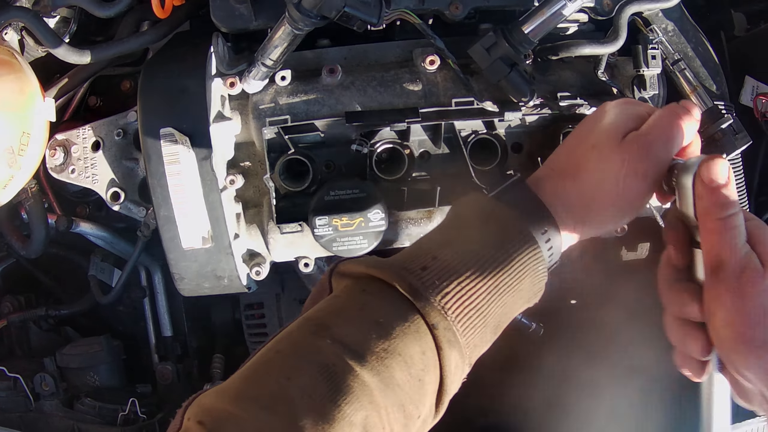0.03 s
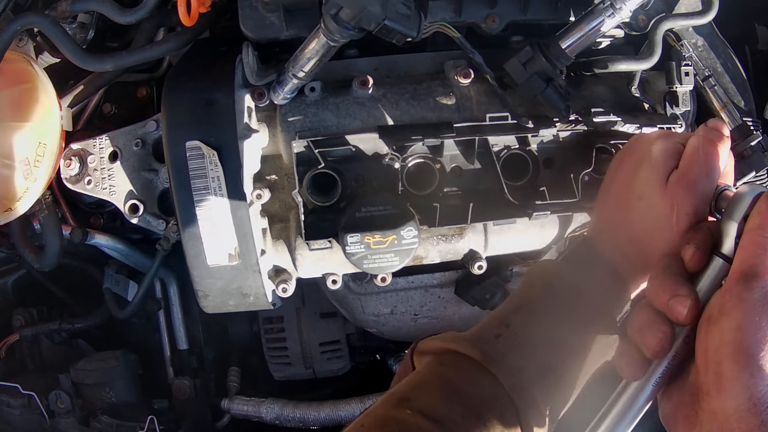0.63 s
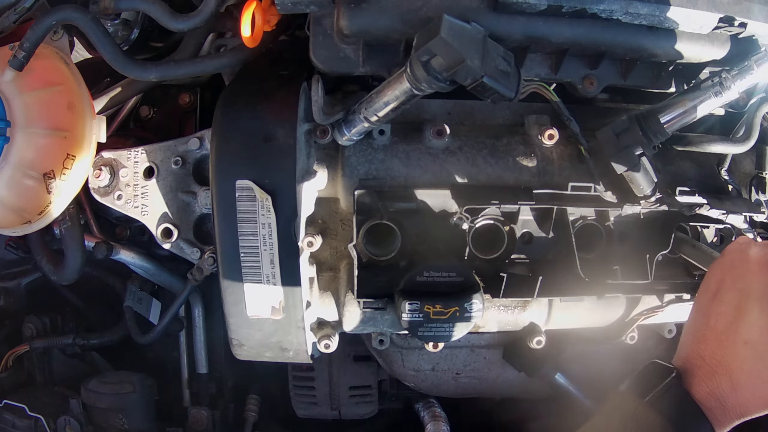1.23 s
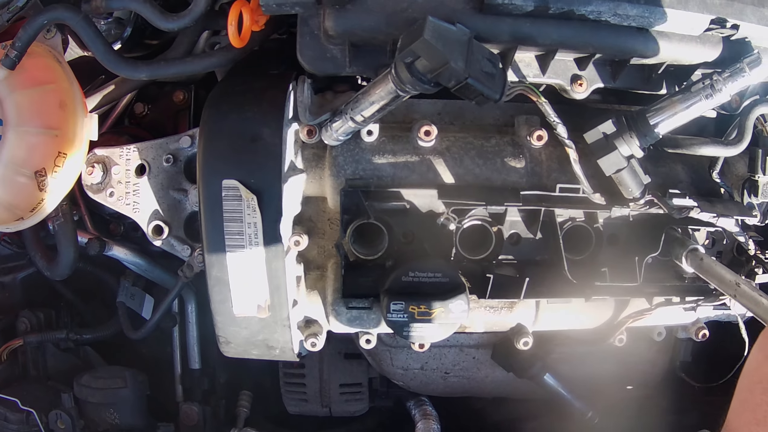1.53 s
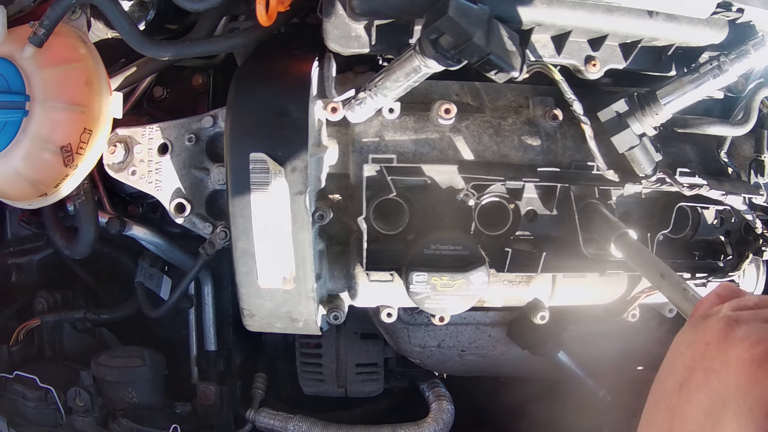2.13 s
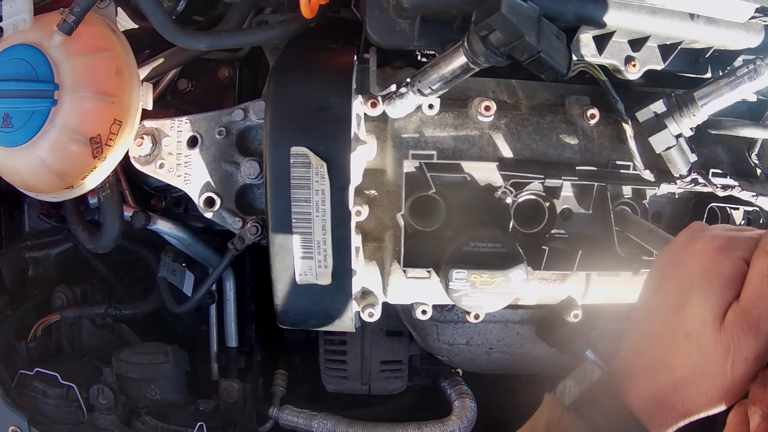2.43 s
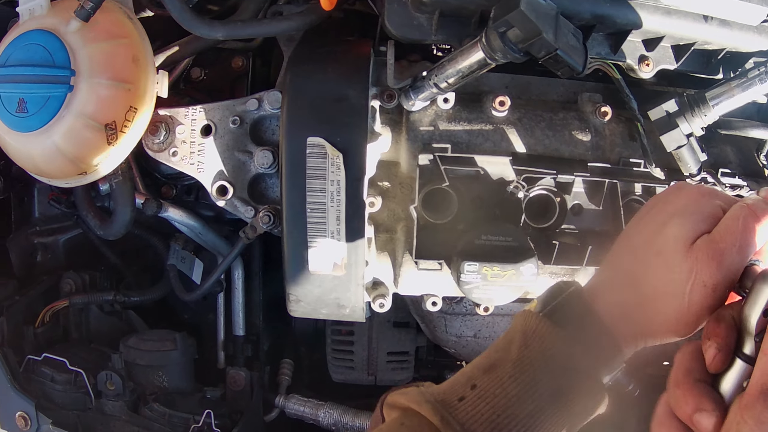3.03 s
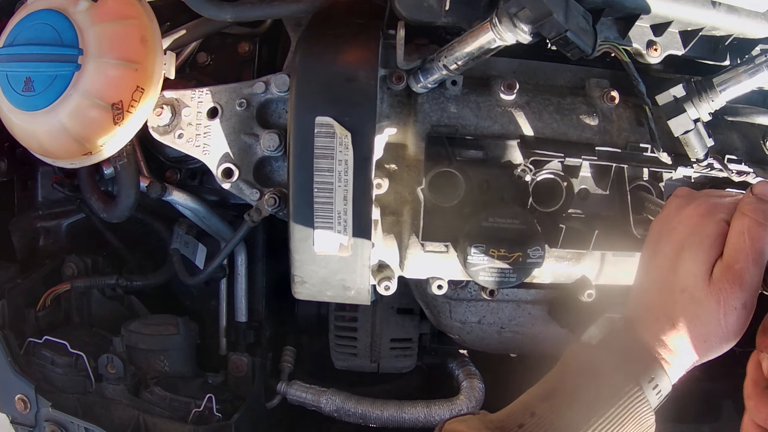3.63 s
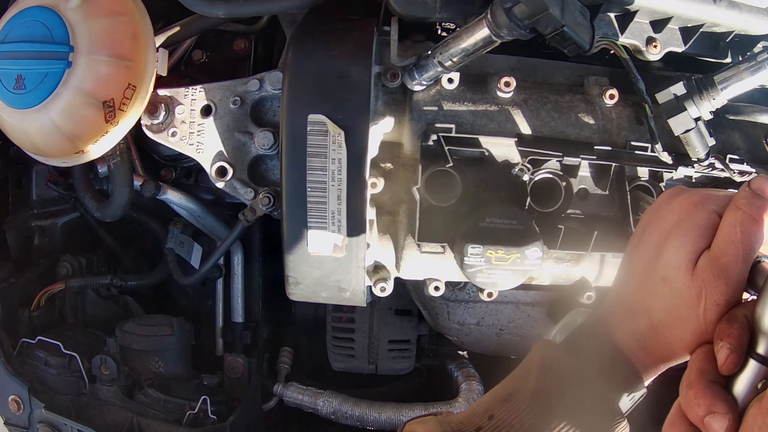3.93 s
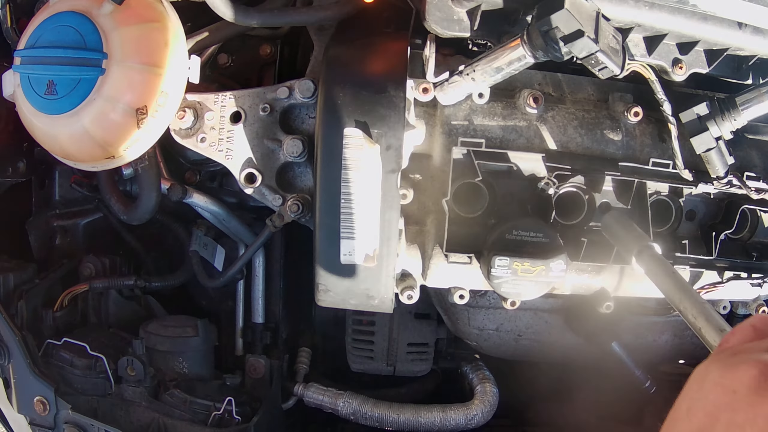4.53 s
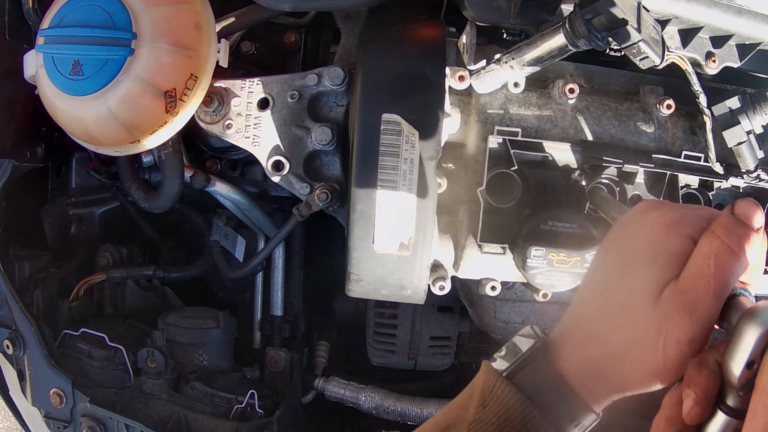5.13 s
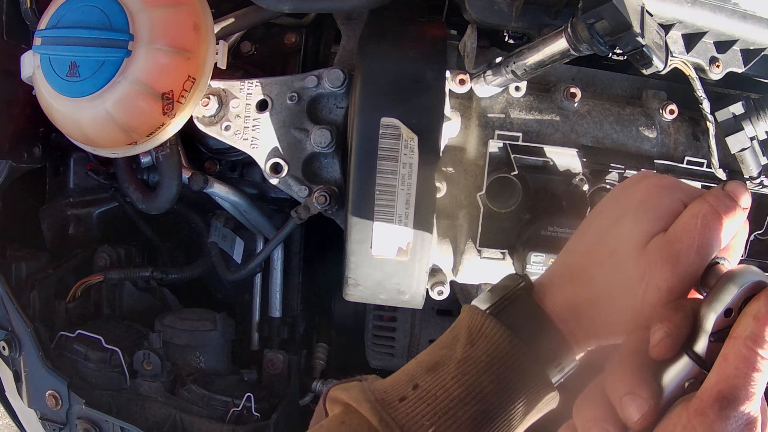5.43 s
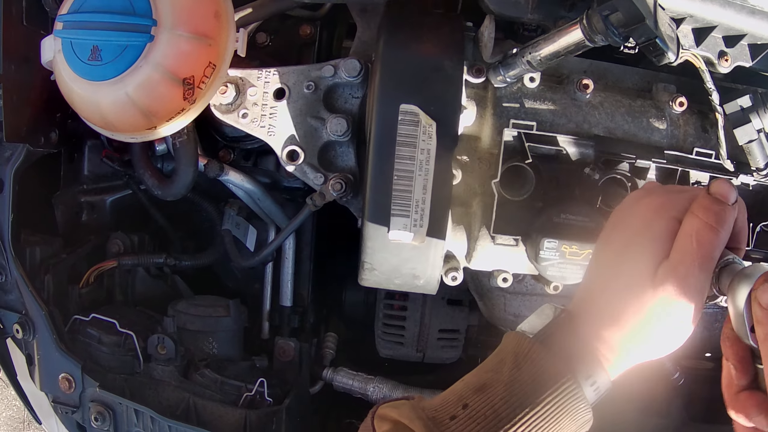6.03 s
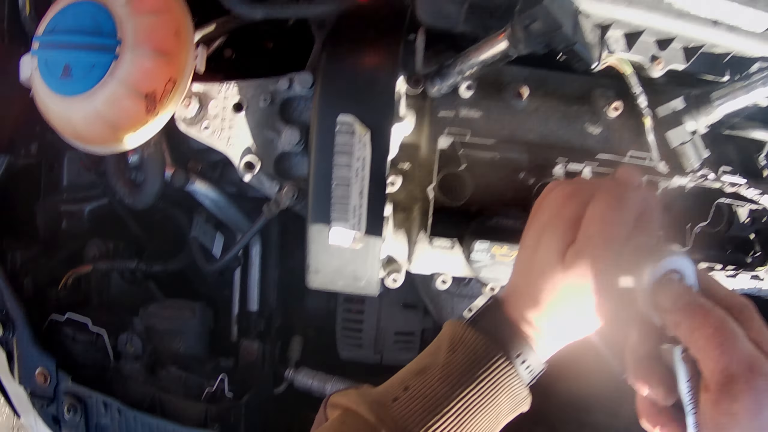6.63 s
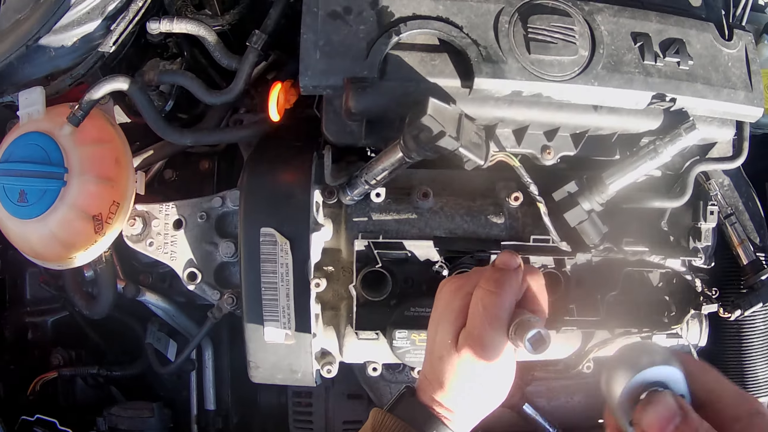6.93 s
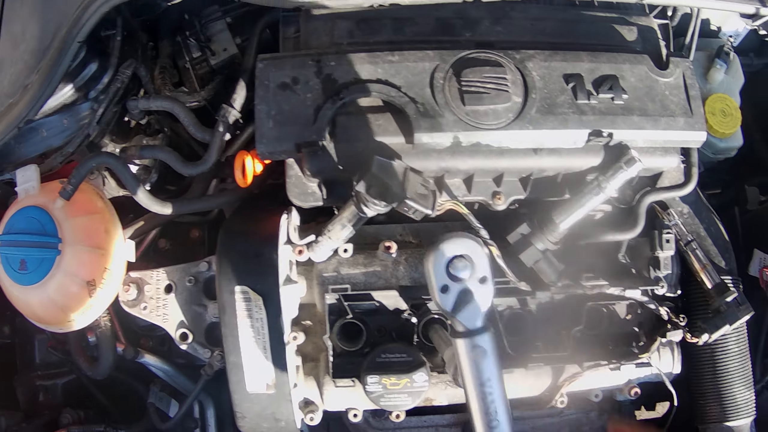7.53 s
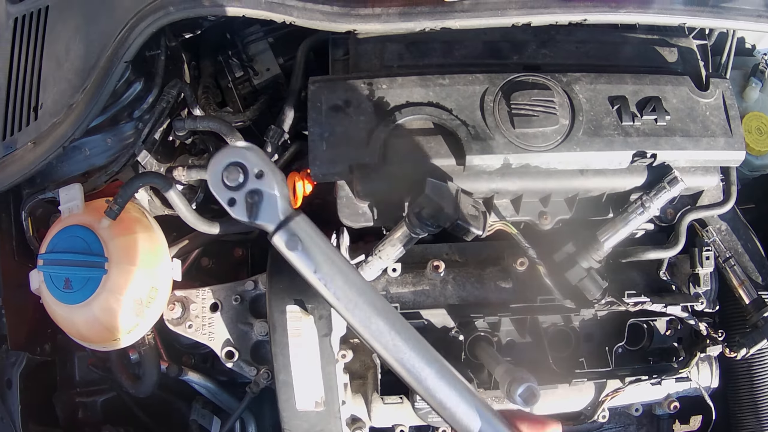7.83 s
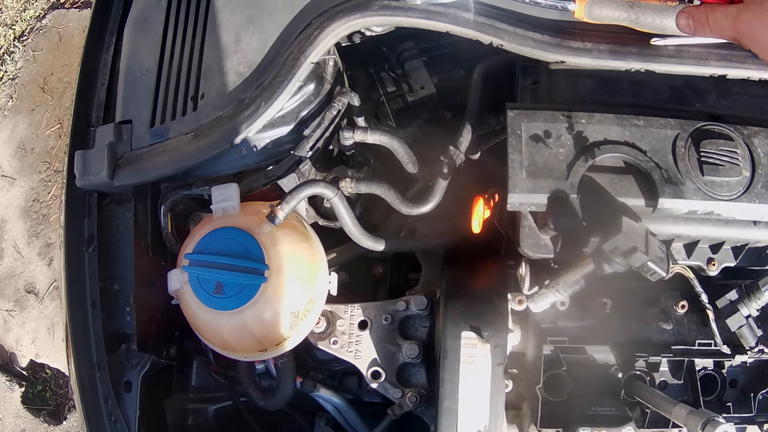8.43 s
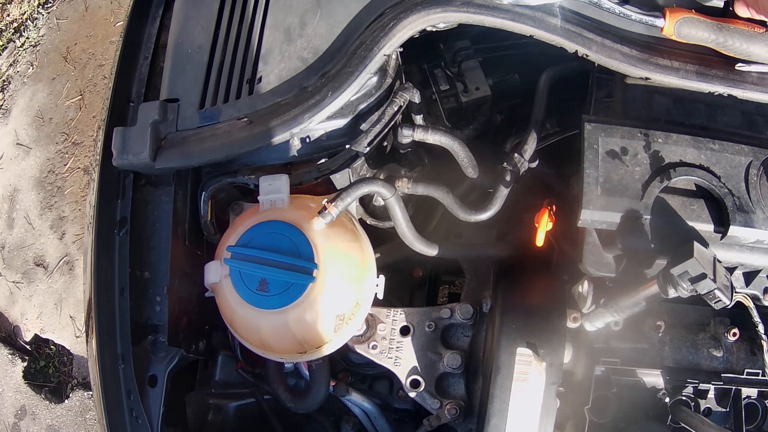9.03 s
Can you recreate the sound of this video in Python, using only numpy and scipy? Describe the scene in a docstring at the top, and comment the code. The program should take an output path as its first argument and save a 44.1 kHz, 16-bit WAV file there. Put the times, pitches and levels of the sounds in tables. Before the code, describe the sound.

Close by, a steel socket clinks and scrapes in the spark plug wells of a stopped car engine. A ratchet clicks in two short spells, one near the start and one a few seconds later, among scattered taps, a dull thud and soft sleeve rustle. At the end the wrench is laid down and bounces on a hollow plastic panel, the loudest sound. The background is very quiet.

```python
"""Working on a car's spark plugs

A spark-plug socket and a torque wrench are used on a cold engine, close by. Steel clinks and scrapes
in the plug wells, the ratchet clicks through two back swings, and hands and a sleeve rub.
At the end the wrench is laid on the plastic cowl, where it bounces and drums the hollow panel."""
import sys
import numpy as np
from scipy import signal
from scipy.fft import rfft, irfft
from scipy.io import wavfile

SR = 44100
rng = np.random.default_rng(int(sys.argv[2]) if len(sys.argv) > 2 else 0)


def generate_wav(signal):
    """Clip the signal to [-1, 1] and save it as 16-bit WAV at the path in sys.argv[1]."""
    frames = np.transpose(np.atleast_2d(signal))
    scaled = np.clip(frames, -1, 1) * 32767
    pcm = np.round(scaled).astype(np.int16)
    wavfile.write(sys.argv[1], SR, pcm)


N = 408807
T = np.arange(N) / SR
HIT_T = np.arange(SR * 3 // 5) / SR  # the clock for a single hit, in seconds


def amp(db):
    """Turn decibels into a gain."""
    return 10 ** (np.asarray(db) / 20)


def unit(x):
    """Scale to an average power of 1."""
    return x / np.sqrt(np.mean(x ** 2))


def unit_energy(x):
    """Scale to a total energy of 1."""
    return x / np.sqrt(np.sum(x ** 2))


def add(out, s, x):
    """Mix x into out, starting at s seconds."""
    i = int(s * SR)
    out[i:i + len(x)] += x[:len(out) - i]


def gain_curve(rows):
    """Join (t/s, level/dB) points into a gain for every sample."""
    return amp(np.interp(T, *np.transpose(rows)))


def colour(x, points):
    """Make some pitches louder and others softer, following (f/Hz, level/dB) points."""
    size = 4096
    hz, db = np.transpose(points)
    grid_hz = np.arange(size // 2 + 1) * SR / size + 1
    log_gain = np.log(amp(np.interp(np.log(grid_hz), np.log(hz), db)))
    # folding the cepstrum keeps the filter from sounding before a hit
    cepstrum = irfft(log_gain)
    cepstrum[1:size // 2] *= 2
    cepstrum[size // 2 + 1:] = 0
    return signal.fftconvolve(x, irfft(np.exp(rfft(cepstrum))))[:len(x)]


def band(x, hz, width_hz):
    """Keep the pitches near hz."""
    return signal.lfilter(*signal.iirpeak(hz, hz / width_hz, fs=SR), x)


def fade(t, t60):
    """Die away by 60 dB in t60 seconds, the ring time."""
    return np.exp(-np.log(1000) * t / t60)


def ping(hz, t, t60):
    """One fading tone of energy 1."""
    return unit_energy(np.sin(2 * np.pi * hz * t) * fade(t, t60))


def ring(modes, t, detune=0):
    """A struck object rings with its own tones; the grip shifts each a little (detune)."""
    return sum(amp(db) * fade(t, t60) * np.cos(2 * np.pi * hz * (1 + detune * rng.standard_normal()) * t)
               for hz, db, t60 in modes)


def scatter(t, t60):
    """A blur of fading echoes, of energy 1."""
    return unit_energy(rng.standard_normal(len(t)) * fade(t, t60))


def contact(modes, chatter_s, ring_db, bay_db, bay_t60, detune):
    """Steel chatters for a moment, rings, and echoes round the engine bay."""
    t = HIT_T[:SR // 6]
    force = unit_energy(rng.standard_normal(len(t)) * np.exp(-(t / chatter_s) ** 2))
    ringing = unit_energy(signal.fftconvolve(force, ring(modes, t, detune))[:len(t)])
    return unit_energy(force + amp(ring_db) * ringing + amp(bay_db) * scatter(t, bay_t60))


def strokes(moves):
    """The gain of hand movements: each swells to its loudest point and dies away."""
    out = np.zeros(N)
    rise_share, depth_db = 0.41, 19  # part of a stroke spent rising; how much softer its ends are
    for s, db, length_s in moves:
        away = np.maximum((s - T) / rise_share, (T - s) / (1 - rise_share)) / length_s
        out = np.maximum(out, amp(db - depth_db * np.minimum(away, 4) ** 1.01))
    return out


def rub(moves, points, grain_db, grain_hz):
    """Rubbing is countless tiny slips, whose strength wanders grain_hz times a second."""
    noise = rng.standard_normal(N)
    count = int(N / SR * grain_hz) + 2
    wander = np.interp(T * grain_hz, np.arange(count), rng.standard_normal(count))
    slips = noise * amp(grain_db * wander)
    return unit(colour(slips, points)) * strokes(moves)


# the tone colour of the air: f/Hz, level/dB (in all tables, levels compare one row with another)
AIR_COLOUR = [(12, -35.5), (20, -11), (80, -1), (175, -9), (225, -8), (306, -15), (393, -16), (534, -18),
              (597, -20.5), (857, -15.5), (1100, -20.5), (1200, -22.5), (1380, -24.5), (2540, -32),
              (15500, -34)]
# how loud the distant drone is: t/s, level/dB
DRONE_LEVELS = [(0, -72.5), (5.8, -69.5), (6.5, -88.5), (9.2, -78)]
# the pitches of the whine: f/Hz, level/dB
WHINE_TONES = [(6400, -90.5), (10400, -89)]
def background():
    """Quiet air, a wavering low drone far away and a faint electronic whine."""
    air = amp(-66) * unit(colour(rng.standard_normal(N), AIR_COLOUR))
    low_band = signal.butter(2, [68, 86], "band", fs=SR, output="sos")
    drone = unit(signal.sosfilt(low_band, rng.standard_normal(N)))
    whine = sum(amp(db - 5.5) * unit(band(rng.standard_normal(N), hz, width_hz=60))
                for hz, db in WHINE_TONES)
    return air + drone * gain_curve(DRONE_LEVELS) + whine


# slides of the socket: loudest at t/s, level/dB, length/s
SCRAPES = [(0.005, -58, 0.094), (0.11, -58.5, 0.18), (1.28, -66, 0.7), (1.7, -66, 0.23), (2.5, -56.5, 0.49),
           (4.22, -59.5, 0.23), (4.4, -63, 0.14), (5.0, -59, 0.13), (5.14, -58.5, 0.39),
           (5.48, -60.5, 0.17)]
# their tone colour: f/Hz, level/dB
SCRAPE_COLOUR = [(100, -33), (400, -6), (620, 2), (850, 3), (1200, -9.5), (1700, -15), (2300, -22.5),
                 (3500, -25), (8000, -32)]
def scrapes():
    """The socket slides along a plug well, the deep hole that holds a spark plug."""
    return rub(SCRAPES, SCRAPE_COLOUR, grain_db=3.0, grain_hz=127.3)


# dry ticks in the tool's joints: t/s, level/dB, treble/dB
JOINT_TICKS = [(.008, -53, -3), (0.1968, -51.5, -32), (.946, -46.5, -24), (.969, -59, 9),
               (2.942, -48.5, -1), (3.434, -42, -12), (4.349, -49, -9), (7.044, -49.5, -9)]
def joint_ticks():
    """A loose joint is pulled tight in the hand: too short and too muffled to ring."""
    out = np.zeros(N)
    t = HIT_T[:SR // 10]
    for s, db, treble_db in JOINT_TICKS:
        crack = scatter(t, t60=0.0093) + amp(-6) * scatter(t, t60=0.06)
        tint = [(150, 18), (900, 9.2), (2000, 1.3), (3500, 5.9),
                (5500, treble_db), (8000, treble_db - 17)]
        add(out, s, amp(db + 14.5) * unit_energy(colour(crack, tint)))
    return out


# the tones of the socket and its extension bar: f/Hz, level/dB, ring time/s
SOCKET_TONES = [(659, 2.5, 0.063), (806, -15, 0.13), (1227, -5.5, 0.079), (1730, -5, 0.037),
                (2060, -5, 0.13), (2400, -12, 0.059), (3000, -7.5, 0.067), (3420, -4, 0.027),
                (5090, 5.5, 0.032), (5670, 2.5, 0.037), (5960, 6.5, 0.019)]
def clink(body_db, treble_db, lead_hz):
    """The socket touches the plug, the well or the wrench, and rings over a light thud."""
    t = HIT_T[:SR // 6]
    hit = contact(SOCKET_TONES, chatter_s=0.0056, ring_db=-4, bay_db=0, bay_t60=0.14, detune=0.0167)
    lead = amp(-9.5) * ping(lead_hz, t, t60=0.037)  # where the tool is touched decides which tone leads
    well_hz = 812 * (1 + 0.0784 * rng.standard_normal())  # random, as the socket's depth varies
    well = amp(-12) * ping(well_hz, t, t60=0.12)
    tint = [(60, -28), (300, body_db - 8), (780, body_db + 6.5), (1400, 0), (2800, -1.5), (3700, -4.5),
            (4300, treble_db + 0.5), (5500, treble_db + 0.5), (6500, treble_db - 3.5),
            (8000, treble_db - 13.5), (15000, treble_db - 17)]
    return colour(hit + lead + well, tint) + amp(-9.5) * thud()


# the tone colour of a thud: f/Hz, level/dB
THUD_COLOUR = [(50, -14), (140, 1.5), (300, -1.5), (450, -10), (900, -9), (3000, -51)]
def thud():
    """The cylinder head, the heavy top of the engine, answers a knock slowly and low."""
    return amp(-6.5) * unit_energy(colour(scatter(HIT_T[:SR // 6], t60=0.15), THUD_COLOUR))


# steel touching steel: t/s, level/dB, low body/dB, treble/dB, leading f/Hz, bounce after/s (0 = none)
CLINKS = [(0.0961, -39, 2, -6, 3730, 0), (0.8964, -55.5, 1.5, -11, 2400, 0),
          (1.2245, -47.5, 3.5, -6, 2010, 0.0012), (1.2406, -43.5, -6, -15, 1634, 0.012),
          (1.307, -55, -14, -24, 1640, 0), (1.3462, -46.5, -12, -16, 1620, 0.0012),
          (1.6585, -52, -9, -16, 1660, 0), (1.711, -51, -15, -14, 1670, 0.0032),
          (1.8154, -50.5, 4.5, -8, 4156, 0.005), (2.4473, -52.5, 7.5, -11, 1374, 0.0044),
          (2.7415, -38, -9, -13, 1810, 0), (2.8218, -41, -6.5, -19, 3240, 0.0008),
          (2.8673, -36, -7, -11, 1651, 0.012), (3.17, -59.5, 8, -16, 3400, 0.0014),
          (3.7301, -52.5, -12, -9, 1830, 0), (4.1755, -38, -7, -7.5, 2330, .025),
          (4.8, -54, -0.5, -7.5, 2870, .02), (4.9713, -47, 1, -13, 3190, 0.0017),
          (5.1232, -48.5, 9, -19, 1459, 0.0013), (5.1382, -44, 1.5, -1.5, 3390, .033),
          (5.432, -48, 3, -3, 1730, 0.0037), (5.4808, -40, -1, -9.5, 1700, 0.026),
          (5.6429, -49.5, -15, -0.5, 3440, 0), (6.6328, -54.5, -6.5, 0.5, 4040, 0),
          (6.6597, -49.5, -12, 0, 2510, 0), (6.6978, -50, -5, 2, 3215, 0.00087),
          (6.7708, -55.5, 1, 6, 1850, 0), (6.9426, -50, -19, 2.5, 3030, 0.0077),
          (9.2202, -39, -3, -26, 3390, 0)]
def socket_clinks():
    """Loose touches clink; some bounce once, weaker and duller."""
    out = np.zeros(N)
    for s, db, body_db, treble_db, lead_hz, bounce_s in CLINKS:
        add(out, s, amp(db) * clink(body_db, treble_db, lead_hz))
        if bounce_s > 0:
            add(out, s + bounce_s, amp(db - 6.5) * clink(body_db + 0.5, treble_db - 8, lead_hz))
    return amp(21) * out


# the tones of the ratchet head: f/Hz, level/dB, ring time/s
RATCHET_TONES = [(888, -15, 0.16), (1740, -15, 0.033), (3330, -0.5, 0.029), (3940, -2, 0.021),
                 (4460, -23, 0.015), (6090, 1.5, 0.014), (6280, 4.5, 0.017), (11540, -2, 0.018)]
# the tone colour of one click: f/Hz, level/dB
CLICK_COLOUR = [(200, -15), (800, 4), (1400, -2.5), (2200, -3.5), (3600, -8), (5000, -4), (6300, -6.5),
                (7600, -12.5), (11500, -11), (15500, -20)]
# short runs of clicks: t/s, teeth, first gap/s, each gap over the one before, level/dB,
# change per tooth/dB, low body/dB, high treble/dB
CLICK_RUNS = [(0.5249, 5, 0.019, 0.95, -48.5, 1.8, -15, -28), (0.617, 2, 0.026, 1, -41.5, 1, -12, -24.5),
              (0.6582, 3, 0.014, 1, -41.5, -1, -17.5, -22), (0.6915, 2, .0285, 1, -42.5, 1, -17.5, -20),
              (0.7432, 2, .0345, 1, -41, -2.5, -14, -21), (3.6713, 4, .0264, .83, -48.5, 1, -14.5, -19.5),
              (3.7588, 4, 0.021, 0.95, -46, 0.5, -11.5, -15), (3.843, 4, 0.021, 1.285, -40.5, -1, -11, -16)]
def ratchet():
    """On the back swing a small catch snaps over tooth after tooth, faster or slower with the hand."""
    out = np.zeros(N)
    t = HIT_T[:SR // 6]
    for s, teeth, gap_s, gap_ratio, db, swell_db, body_db, top_db in CLICK_RUNS:
        for tooth in range(round(teeth)):
            snap = contact(RATCHET_TONES, chatter_s=0.0049, ring_db=-0.5, bay_db=-0.5,
                           bay_t60=0.13, detune=0.023)
            # every tooth has a body and a pitch of its own
            tooth_body_db = body_db + 10.5 + 1.5 * rng.standard_normal()
            tooth_hz = 3910 * (1 + 0.143 * rng.standard_normal())
            tint = [(1900, tooth_body_db), (4000, 0), (6800, 0), (9000, top_db + 16)]
            snap = unit_energy(colour(colour(snap, CLICK_COLOUR), tint))
            click = unit_energy(snap + amp(-11.5) * ping(tooth_hz, t, t60=0.042))
            add(out, s, amp(db + swell_db * tooth + 16) * click)
            s += gap_s * gap_ratio ** tooth
    return out


# brushes of the sleeve and hand: loudest at t/s, level/dB, length/s
SLEEVE_RUBS = [(1.29, -63, 0.53), (5.15, -67, 0.11), (6.82, -60.5, 0.44), (6.95, -55, .13),
               (7.15, -67, .25), (7.24, -64, 0.11), (7.47, -67, .28)]
# their tone colour: f/Hz, level/dB
SLEEVE_COLOUR = [(80, -24), (220, -7), (400, 1), (560, -8.5), (1000, -10), (2500, -34.5), (8000, -34.5)]
def sleeve():
    """Cloth and skin rub with a soft rustle."""
    return rub(SLEEVE_RUBS, SLEEVE_COLOUR, grain_db=3.5, grain_hz=80.3)


# movements that rumble: loudest at t/s, level/dB, length/s
HANDLING_MOVES = [(1.27, -58.5, 0.44), (7.35, -57.5, 0.2), (7.48, -53.5, .24)]
# their tone colour: f/Hz, level/dB
HANDLING_COLOUR = [(20, -11), (50, 6), (110, 6), (200, -8), (400, -25), (1500, -41)]
def handling():
    """Moving hands make a low, uneven rumble."""
    return rub(HANDLING_MOVES, HANDLING_COLOUR, grain_db=3.5, grain_hz=40.67)


# firm pushes on the socket: t/s, level/dB
PRESSES = [(1.2241, -41.5), (2.7411, -37.5), (2.8232, -41.5), (2.8672, -29), (2.8777, -36)]
def socket_presses():
    """The socket is pressed home and thuds in the cylinder head."""
    out = np.zeros(N)
    for s, db in PRESSES:
        add(out, s, amp(db + 21) * thud())
    return out


# short drags of the tool: t/s, length/s, f/Hz, level/dB
SQUEAKS = [(1.361, 0.082, 1950, -72), (1.432, 0.17, 2400, -78.5), (1.66, 0.092, 1620, -66.5),
           (6.82, 0.062, 430, -60.5)]
def squeaks():
    """As the tool drags, fast, uneven slips keep one rough tone sounding."""
    out = np.zeros(N)
    for s, length_s, hz, db in SQUEAKS:
        count = int(length_s * SR)
        slips = rng.standard_normal(len(HIT_T))[:count] ** 3
        tone = band(slips, hz, width_hz=0.13 * hz)
        tone = unit(band(tone, hz, width_hz=1.2 * hz))
        add(out, s, amp(db) * tone * signal.windows.tukey(count, 0.5))
    return out


# how loud the hiss is: t/s, level/dB
HISS_LEVELS = [(2.3, -95), (2.5, -90), (2.7, -85), (2.9, -74), (3.1, -101), (8.68, -96), (8.8, -74),
               (9.0, -71), (9.26, -72)]
# its tone colour: f/Hz, level/dB
HISS_COLOUR = [(300, -13), (2000, -0.5), (7000, -2.5), (15000, -2.5)]
def hiss():
    """A faint, bright hiss swells twice."""
    return unit(colour(rng.standard_normal(N), HISS_COLOUR)) * gain_curve(HISS_LEVELS)


# the tones of the wrench head on plastic: f/Hz, level/dB, ring time/s
WRENCH_TONES = [(935, -0.5, 0.035), (1454, -9, 0.067), (1955, -2.5, 0.043), (2140, -14, 0.057),
                (2660, -23, 0.048), (3090, 3, 0.021), (3400, -6.5, 0.036), (4040, -2, 0.031),
                (5770, -14, 0.018)]
# the tone colour of its tick: f/Hz, level/dB
WRENCH_COLOUR = [(150, -34), (700, 16), (2000, 2), (3200, -4), (4500, -14), (6300, -13.5), (8000, -26.5),
                 (15000, -28.5)]
def wrench_tick():
    """The steel wrench meets the plastic with a hard tick."""
    hit = contact(WRENCH_TONES, chatter_s=0.005, ring_db=3.5, bay_db=6, bay_t60=0.09, detune=0.018)
    return unit_energy(colour(hit, WRENCH_COLOUR))


# the tones of the cowl, the hollow panel below the windscreen: f/Hz, level/dB, ring time/s
COWL_TONES = [(82.2, -9.5, 0.46), (118.9, -17.5, 0.75), (165, -7, 0.32), (186, -0.5, 0.3),
              (244.8, -1.5, 0.99), (259.5, 3, 0.21), (302.2, -5.5, 0.43), (336, -9, 0.31), (370, -16, .2),
              (443, -7, 0.4), (502, -15, 0.17), (576, -18, 0.68), (746, -19, 0.34), (892, 2, 0.046),
              (963, -10, .16), (1056, -22.5, 0.14), (1160, -17.5, 0.2)]
# the tone colour of the panel bending: f/Hz, level/dB
FLEX_COLOUR = [(40, -30.5), (110, -12.5), (220, 6.5), (440, 2.5), (700, -13.5), (1000, -18), (1400, -25),
               (2500, -35.5), (6000, -72)]
# bounces of the wrench: t/s, tick level/dB, strike level/dB, weight follows after/s,
# weight level/dB, weight muffled above f/Hz, times it rocks afterwards
LANDINGS = [(8.7135, -27.5, -21.5, 0.014, -11, 1210, 0), (8.7654, -42.5, -14.5, .0215, -23, 694, 0),
            (8.834, -21.5, -17, .0136, -10.5, 1260, 0), (8.8847, -35, -17.5, 0.00865, -15.5, 720, 0),
            (8.9192, -20, -19.5, 0.00703, -9, 686, 2), (8.991, -34, -38, .0091, -17, 343, 2),
            (9.221, -34.5, -25, 0.011, -24.5, 210, 0)]
def wrench_on_cowl():
    """One end of the wrench strikes, then its weight follows; each push drums the hollow panel."""
    out, far_edge = np.zeros(N), np.zeros(len(HIT_T))
    impulse = 1.0 * (HIT_T == 0)
    flex = colour(impulse, FLEX_COLOUR)
    flex /= np.max(np.abs(flex))
    # the bend travels across the panel and comes back duller
    add(far_edge, 0.011, amp(-10.5) * colour(flex, [(300, 4.5), (600, -17), (1500, -14)]))
    drum_tint = [(40, -7), (90, 0), (1100, -0.5), (2200, -34), (6000, -51)]
    drum = amp(-19) * colour(ring(COWL_TONES, HIT_T), drum_tint)
    rock_gap_s = 0.0172
    for start, tick_db, strike_db, lag_s, weight_db, weight_hz, rocks in LANDINGS:
        weight_s = start + lag_s
        pushes = [(start, strike_db, weight_hz * 1.2), (weight_s, weight_db, weight_hz)]
        for k in range(1, round(rocks) + 1):
            pushes.append((weight_s + k * rock_gap_s, weight_db - 13.5, weight_hz * 0.55))
        for s, push_db, push_hz in pushes:
            # every landing spot sends its own echoes through the bodywork
            echoes = amp(-3.5) * scatter(HIT_T, t60=0.2) + amp(-8.5) * scatter(HIT_T, t60=0.81)
            thump = flex + far_edge + drum + signal.fftconvolve(flex, echoes)[:len(HIT_T)]
            # a softer landing pushes for longer and sounds duller
            muffle = signal.butter(1, push_hz, fs=SR)
            add(out, s, amp(push_db) * signal.lfilter(*muffle, thump))
        add(out, start, amp(tick_db + 13.5) * wrench_tick())
        add(out, weight_s, amp(tick_db + 3) * wrench_tick())
    return out


def scene():
    """Add hands, tools and surroundings into one channel."""
    soft_sounds = scrapes() + sleeve() + handling() + hiss()
    tools = ratchet() + socket_clinks() + socket_presses() + joint_ticks() + squeaks() + wrench_on_cowl()
    return (soft_sounds + tools + background())[None]


def record(dry):
    """Cut away the very highest treble."""
    top_hz = 15800
    return signal.sosfilt(signal.ellip(10, 0.2, 70, top_hz, fs=SR, output="sos"), dry)


dry = scene()
out = record(dry)
generate_wav(out)
```